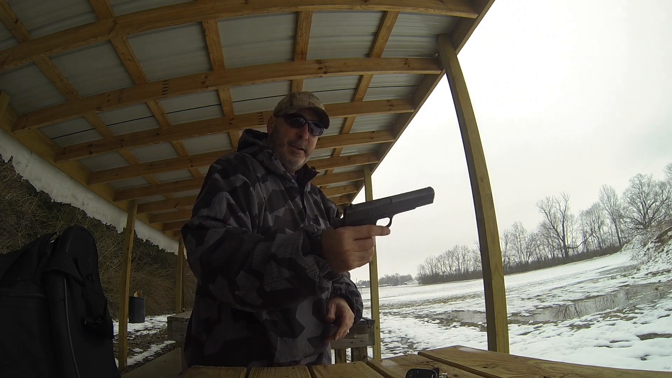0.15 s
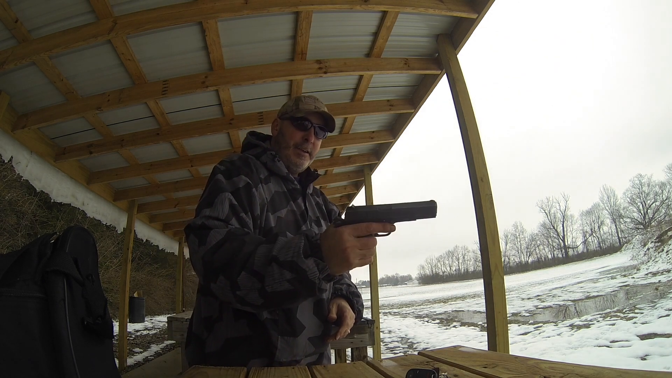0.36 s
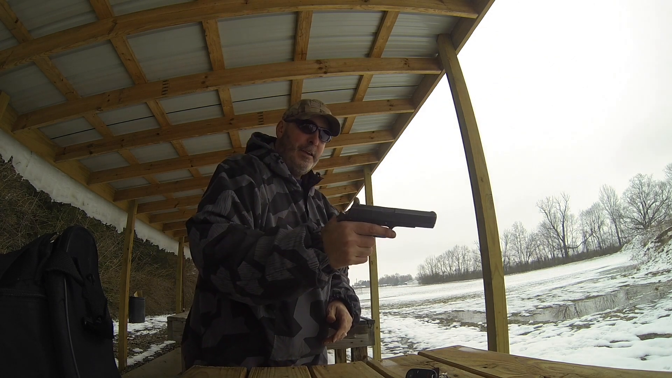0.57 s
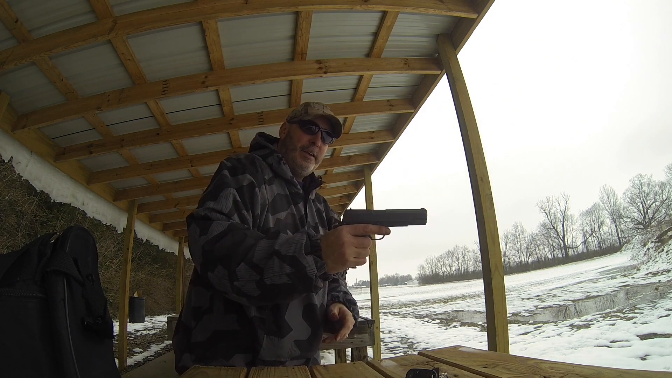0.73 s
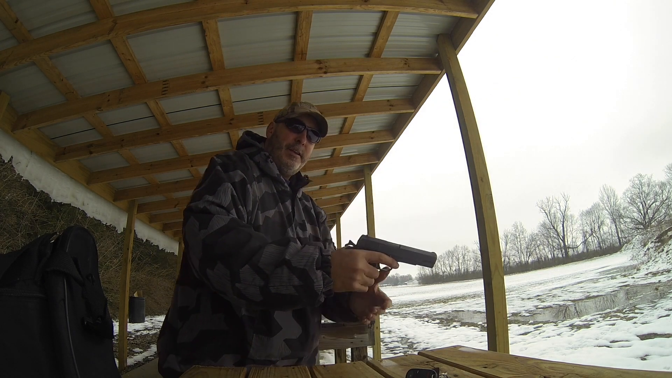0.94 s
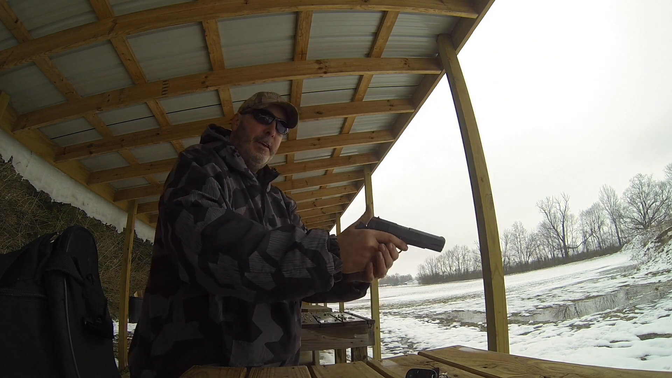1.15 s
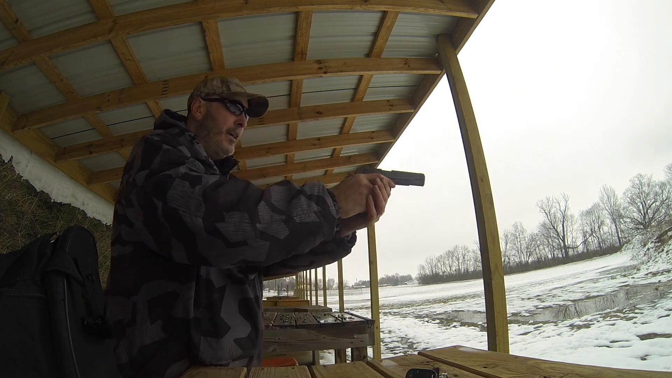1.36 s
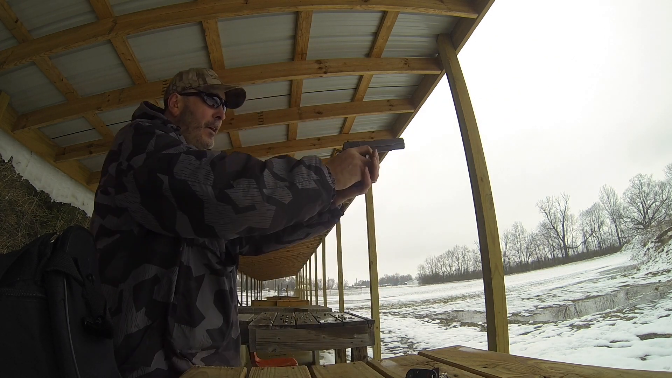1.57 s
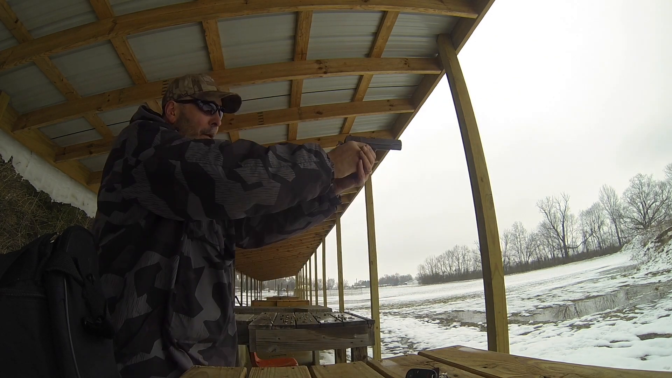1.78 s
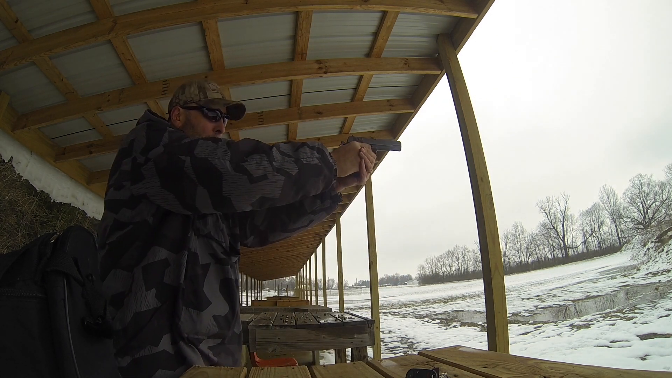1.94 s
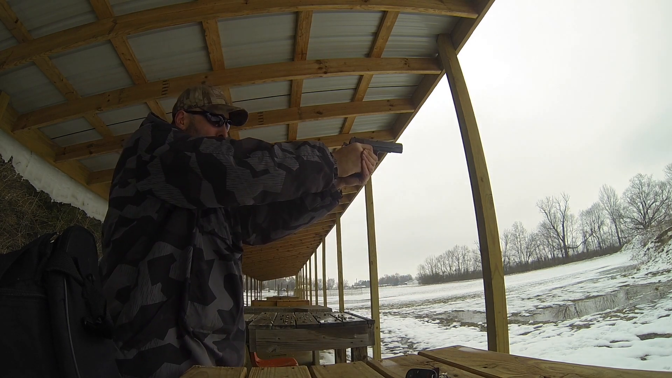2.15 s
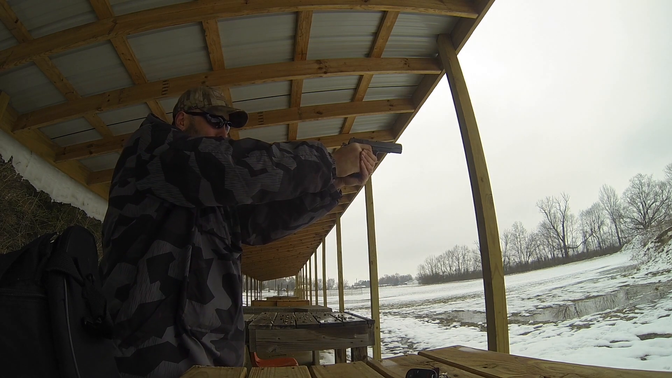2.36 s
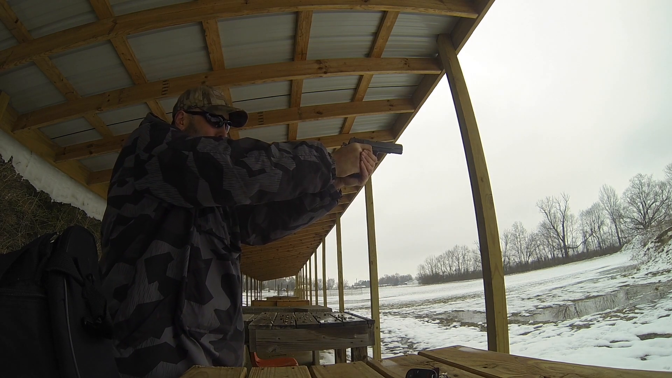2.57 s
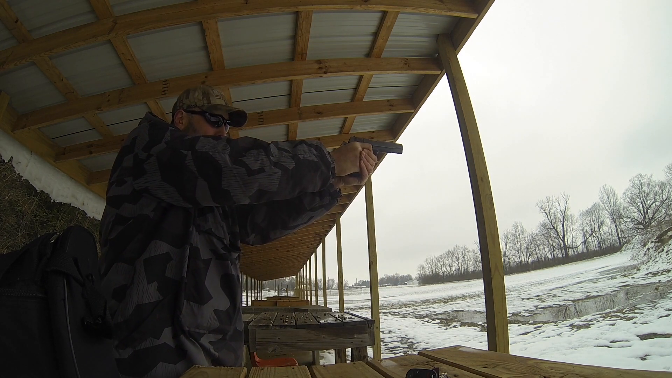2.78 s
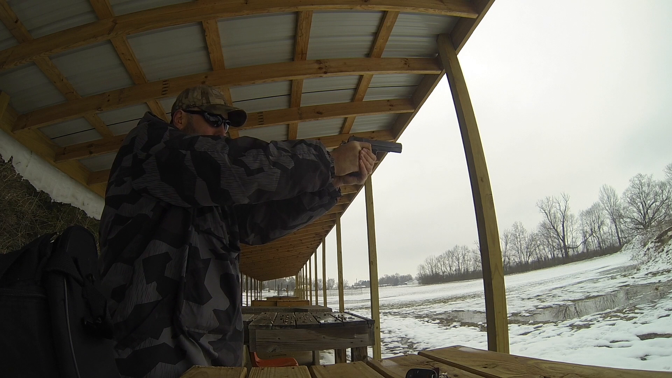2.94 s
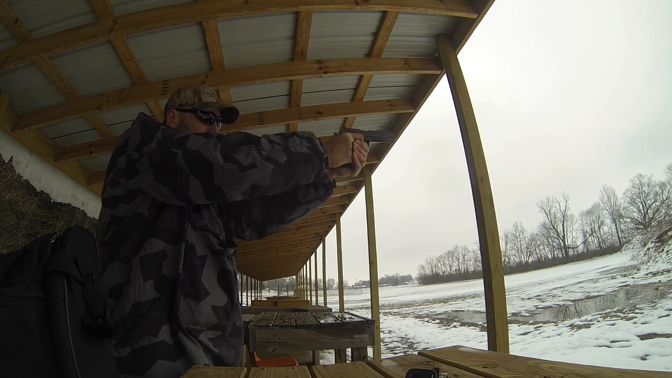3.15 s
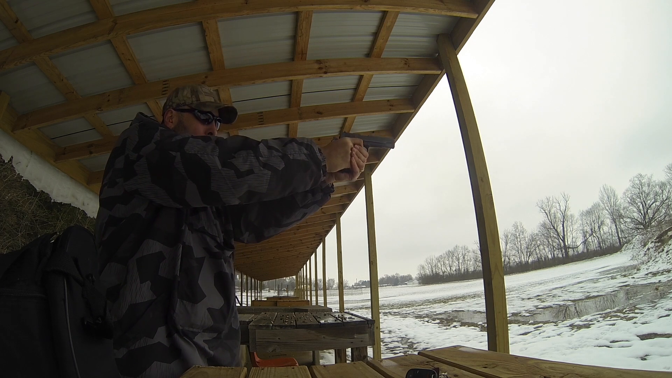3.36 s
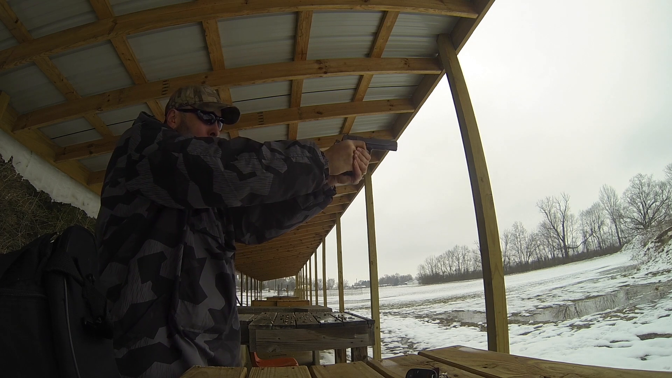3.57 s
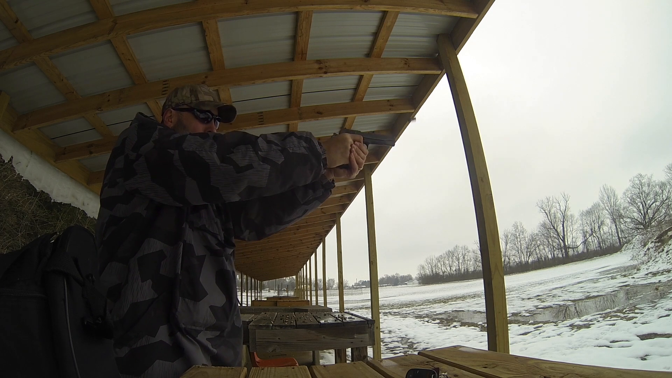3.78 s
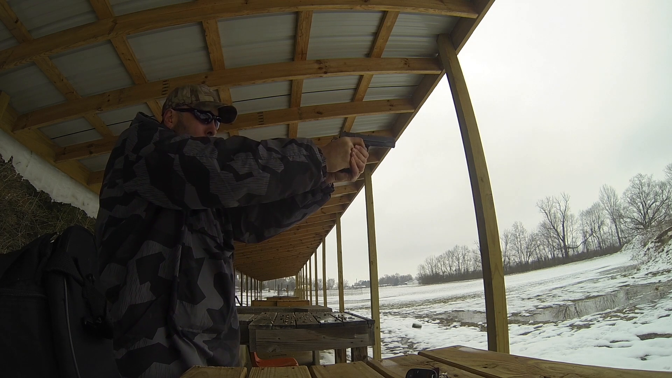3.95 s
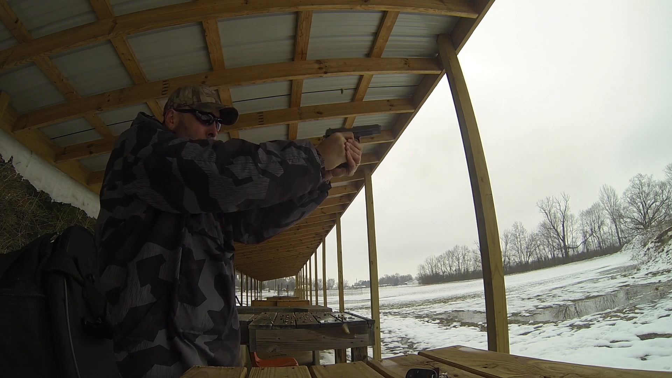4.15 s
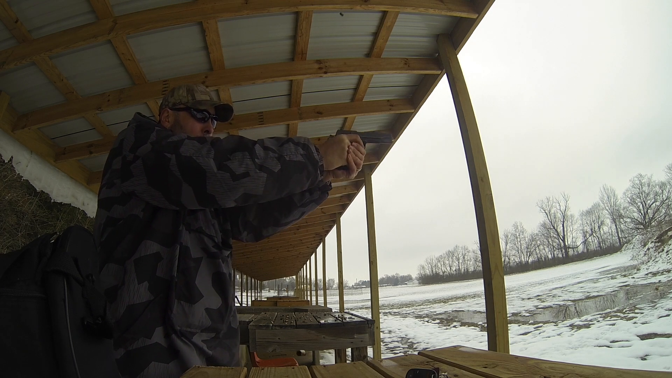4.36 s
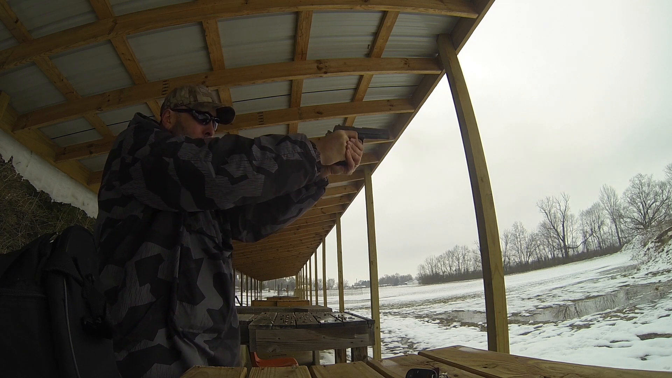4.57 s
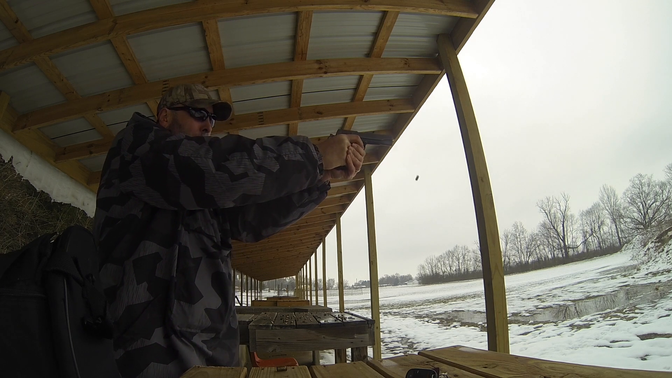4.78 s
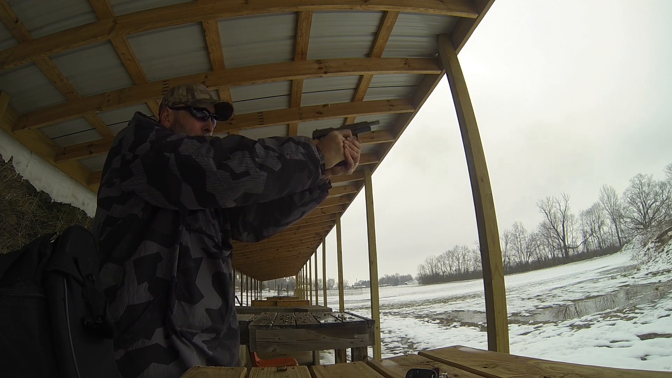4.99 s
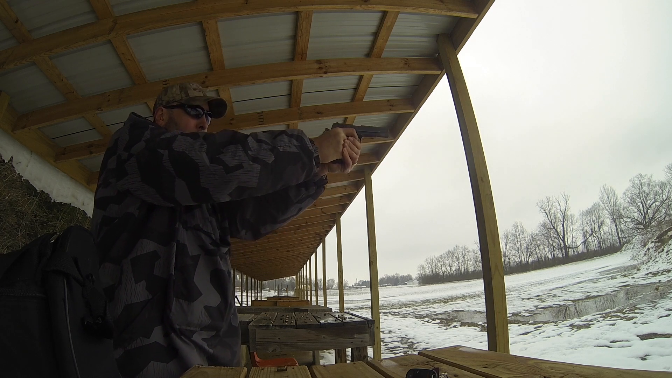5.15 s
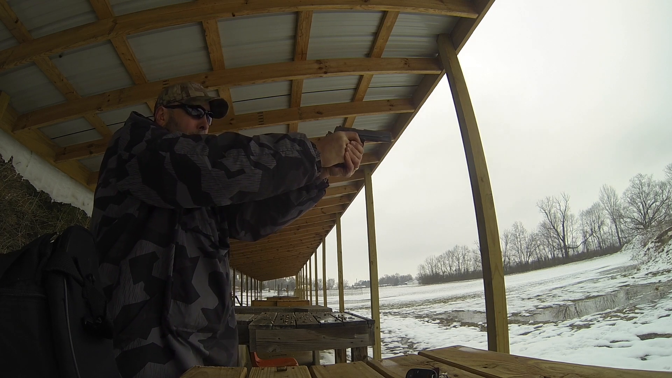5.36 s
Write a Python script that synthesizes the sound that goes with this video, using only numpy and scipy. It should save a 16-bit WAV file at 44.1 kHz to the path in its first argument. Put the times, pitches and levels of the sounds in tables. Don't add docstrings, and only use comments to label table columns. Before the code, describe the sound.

A pistol slide snaps shut, a catch clicks, the bench thuds, then five loud overloading shots crack and echo while spent cases knock nearby.

```python
import sys
import numpy as np
from scipy import signal
from scipy.fft import rfft, irfft, next_fast_len
from scipy.io import wavfile
from scipy.ndimage import uniform_filter1d

SR = 44100
rng = np.random.default_rng(int(sys.argv[2]) if len(sys.argv) > 2 else 0)


def bounce(signal):
    frames = np.transpose(np.atleast_2d(signal))
    limited = np.clip(frames, -1, 1)
    pcm = np.round(limited * 32767).astype(np.int16)
    wavfile.write(sys.argv[1], SR, pcm)


def voltage_ratio(decibels):
    exponent = np.asarray(decibels, float) / 20
    return 10 ** exponent


N = 239011


def unit(x):
    return x / np.sqrt(np.mean(x ** 2) + 1e-20)


def noise(size):
    return rng.standard_normal(size)


def along(points, hz):
    f, v = np.transpose(points)
    return np.interp(np.log(hz + 1), np.log(f + 1), v)


def resonances(modes, f):
    power = 0
    for centre, width, db in modes:
        power = power + voltage_ratio(2 * db) * (f * width) ** 2 / ((centre ** 2 - f ** 2) ** 2 + (f * width) ** 2)
    return np.sqrt(power)


def coloured(x, gain):
    m = 2 * next_fast_len(len(x) // 2 + 8192)
    cepstrum = irfft(np.log(gain(np.fft.rfftfreq(m, 1 / SR)) + 1e-6), m)
    cepstrum[1:m // 2] *= 2
    cepstrum[m // 2 + 1:] = 0
    return irfft(rfft(x, m) * np.exp(rfft(cepstrum)), m)[:len(x)]


def dying(t60s, size):
    hz, t, z = signal.stft(noise(size), SR, nperseg=128)
    fade = voltage_ratio(-60 * t / along(t60s, hz)[:, None])
    return signal.istft(z * fade, SR, nperseg=128)[1][:size]


def add(track, s, sound):
    part = track[round(s * SR):][:len(sound)]
    part += sound[:len(part)]


def hum(modes, t):
    total = 0
    for hz, db, t60 in modes:
        level = voltage_ratio(db + rng.normal(0, 1.93) - 60 * t / t60)
        total = total + level * np.sin(2 * np.pi * (hz * t + rng.random()))
    return total


# frequency in Hz, level in dB per Hz.
HISS = [(20, -1), (53, -1), (310, -15.5), (574, -19), (1200, -24.5), (1550, -21.5), (1900, -27.5),
        (3000, -24.5), (4300, -32.5), (5500, -34.5), (7500, -36), (10800, -39.5), (14700, -39.5),
        (16000, -52.5)]
# frequency in Hz,
# level in dB, switch-on time and length as shares of the read-out, line width in Hz.
WHINE = [(2589, -75, .25, .35, 10), (2998, -74, .6, .2, 10), (5060, -67, .72, .33, 90),
         (5523, -67.5, .11, .23, 90), (10643, -69, .72, .64, 2), (13187, -84, .11, .6, 2)]


def electronics():
    t = np.arange(N) / SR
    hiss = voltage_ratio(-49) * unit(coloured(noise(N), lambda f: voltage_ratio(along(HISS, f))))
    frame = 47.96 * (t - 1.7058)
    drift = np.cumsum(noise(N)) / np.sqrt(SR)
    tones = 0
    for hz, db, on, share, width in WHINE:
        switch = uniform_filter1d(0.28 + 0.82 * ((frame - on) % 1 < share), size=40)
        tone = np.sin(2 * np.pi * hz * t + np.sqrt(2 * np.pi * width) * drift)
        tones = tones + voltage_ratio(db + 4.5) * switch * tone
    beacon_s, beacon_period_s = .0762, .1024
    since = (t - beacon_s + .0098) % beacon_period_s - .01
    rebound = .25 * (since > .002) * np.exp(-np.abs(since) / .012)
    beacon = -np.exp(-(since / .0012) ** 2) + rebound
    return hiss + tones + voltage_ratio(-36.5) * beacon


# frequency in Hz, time to fall 60 dB in seconds.
SHELTER = [(100, 0.57), (500, 0.47), (1500, 0.62), (3000, 0.52), (6000, 0.37), (10000, 0.38), (15000, 0.17)]


def shelter(size):
    t = np.arange(size) / SR
    still_inside = 1 / (1 + np.exp(np.clip((t - .185) / .012, -50, 50)))
    return dying(SHELTER, size) * (.2 + .8 * still_inside)


# frequency in Hz, time to fall 60 dB in seconds.
NEARBY = [(200, 0.098), (1500, 0.19), (4000, 0.044), (12000, .02)]


def nearby(size):
    return dying(NEARBY, size)


# start in seconds, level in dB,
# time for the scrape to fall 60 dB in seconds, brightness in dB per octave.
STEEL_HITS = [(0, -26.5, 0.067, -4), (.0025, -25.5, 0.021, -14.5), (.0108, -14, 0.077, -6.5),
              (.018, -9.5, 0.094, -6), (.0300, -7, 0.044, -2), (.040, -19, 0.15, -7.5),
              (.865, -60, .031, 6), (1.424, -46, .11, -6), (1.549, -48, .036, -14), (1.92, -56, .03, 3)]
# frequency in Hz, width in Hz, level in dB.
STEEL = [(1640, 290, -7.5), (2490, 280, -2.5), (3220, 260, -1), (4457, 160, 0), (4870, 300, 1),
         (7160, 330, 3), (8370, 530, -6), (9530, 560, -4.5), (13200, 2000, -17)]
# start in seconds, level in dB,
# time for the scrape to fall 60 dB in seconds, brightness in dB per octave.
CATCH_HITS = [
    (.5595, -27.5, 0.016, -3),
    (.567, -39, 0.06, 3),
    (.582, -47, 0.064, -4),
    (.662, -47, 0.018, -6),
    (.688, -54, .04, -9),
]
# frequency in Hz, width in Hz, level in dB.
CATCH = [(2450, 500, 0.5), (3130, 260, 4), (3660, 260, -12), (6920, 290, 2.5), (8500, 700, -10),
         (11000, 1200, -16), (13500, 1400, -6.5)]


def pistol_parts():
    out, t = np.zeros(N), np.arange(SR // 5) / SR
    for hits, modes in [(STEEL_HITS, STEEL), (CATCH_HITS, CATCH)]:
        for s, db, t60, tilt_db in hits:
            def colour(f):
                tilt = voltage_ratio(tilt_db * np.log2((f + 100) / 4000))
                no_bass = f ** 2 / (f ** 2 + 1300 ** 2) * f ** 2 / (f ** 2 + 700 ** 2)
                return resonances(modes, f) * tilt * no_bass
            swell = voltage_ratio(-60 * t / t60) * (1 - np.exp(-t / (0.033 * t60)))
            grit = noise(len(t)) * voltage_ratio(5.6 * noise(len(t)))
            scrape = coloured(swell * grit, colour)
            add(out, s, voltage_ratio(db) * scrape / np.abs(scrape).max() * 2)
    tail = shelter(SR // 3) + voltage_ratio(22) * nearby(SR // 3)
    return out + voltage_ratio(-18.0) * signal.fftconvolve(out, tail / np.linalg.norm(tail))[:N]


# start in seconds, sway level in dB, rattle level in dB, time for the
# sway to fall 60 dB in seconds.
BOOMS = [
    (1.287, -21, -45.5, 0.28),
    (1.40, -36.5, -64, 0.36),
    (1.70, -49, -66, 0.35),
]
# frequency in Hz, width in Hz, level in dB.
RATTLE = [(1021, 48, 3.5), (1223, 18, 3), (1560, 49, -0.5), (1696, 58, -0.5), (2210, 68, -14)]


def booms():
    t, all_t = np.arange(SR) / SR, np.arange(N) / SR
    sway, shake = np.zeros(N), np.zeros(N)

    def swell(rise, t60):
        rising = np.sin(np.pi / 2 * np.clip(t / rise, 0, 1)) ** 2
        return rising * voltage_ratio(-60 * np.clip(t - rise, 0, None) / t60)

    for s, sway_db, rattle_db, t60 in BOOMS:
        add(sway, s, voltage_ratio(sway_db) * swell(0.055, t60))
        add(shake, s, voltage_ratio(rattle_db) * swell(0.011, 0.72))
    rattle = unit(coloured(noise(N), lambda f: resonances(list(RATTLE) + [(8330, 660, -27.5)], f)))
    rattle *= 1.75 + .5 * np.cos(2 * np.pi * 24 * all_t)
    bench_hz = 73
    return voltage_ratio(2.5) * sway * np.sin(2 * np.pi * bench_hz * all_t + 1.4) + shake * rattle


# frequency in Hz, level in dB.
TREES = [(100, 1.5), (300, 1.5), (500, 4.5), (1500, 6.5), (3000, -1.5), (4000, -7), (5500, -13),
         (8000, -13.5), (14000, -39.5)]


def far_answer(size):
    t = np.arange(size) / SR
    berm_s, rise_s, fall_s = .17, 0.075, 0.021
    berm = voltage_ratio(4.5) * np.exp(-np.abs(t - berm_s) / np.where(t < berm_s, rise_s, fall_s))
    trees = voltage_ratio(-4) * np.exp(-((t - 0.33) / 0.11) ** 2)
    valley = voltage_ratio(-14.5)
    return (berm + trees + valley) * unit(coloured(noise(size), lambda f: voltage_ratio(along(TREES, f))))


def surroundings(size):
    return voltage_ratio(-4.0) * nearby(size) + voltage_ratio(-19.5) * shelter(size) + voltage_ratio(-46) * far_answer(size)


def echo_rows(size):
    paths = np.zeros(size)
    bench_top, rafters = (0.001399, 0.002198, 12.8, 6.7, 2), (.0085, .0057, 3, 3.5, 8)
    posts, braces = (.0252, .0304, -3.5, 4.5, 6), (.070, .0315, -16, 1.5, 4)
    for s, step, db, loss_db, count in [bench_top, rafters, posts, braces]:
        k = np.arange(count)
        places = np.round((s + step * k) * SR).astype(int)
        paths[places] += rng.choice([-1, 1], count) * voltage_ratio(db - loss_db * k)
    slap = np.arange(110) / SR - .0012
    ripple = np.sin(2 * np.pi * 1600 * slap) * np.exp(-(slap / 0.00061) ** 2)
    return signal.fftconvolve(paths, ripple)[:size]


# start in seconds, blast level in dB, level of the low push in dB.
SHOTS = [
    (3.064, 1.5, 3.5),
    (3.7008, 0, -5),
    (4.1755, -1, -3.5),
    (4.5718, -1, -11.5),
    (5.0370, -1, -4),
]
# frequency in Hz, level in dB.
RUMBLE = [(20, -8), (40, 7.5), (90, 6.5), (160, -1), (300, -13), (600, -57)]
# frequency in Hz, level in dB, time to fall 60 dB in seconds.
SHEET = [(154, -4.5, 0.88), (249, -2.5, 0.48), (278, 3, 0.51), (344, -10.5, 0.5), (425, 5, 0.48),
         (496, 2, 0.38)]


def shots():
    size = round(1.2 * SR)
    t = np.arange(size) / SR
    u = t[:400] / 0.000099
    blast = -(1 - u) * np.exp(-u)
    same = voltage_ratio(-8.0) * echo_rows(size) + 1.054 * surroundings(size)
    same[:400] += voltage_ratio(13) * blast + voltage_ratio(20.0 - 60 * t[:400] / 0.0061) * noise(400)
    roof = voltage_ratio(-35.5) * (0.21 + np.cos(2 * np.pi * 27 * (t - .114))) * np.exp(-((t - .125) / 0.049) ** 4)
    dip = -1.5 * np.sin(np.pi * t / .0075) ** 2
    drift_back = np.tanh((t - .0075) / 0.001) * 0.69 * voltage_ratio(-60 * t / 0.084)
    overload = np.where(t < .0075, dip, drift_back)
    air, push = np.zeros(N), np.zeros(N)
    for s, db, push_db in SHOTS:
        add(air, s, voltage_ratio(db) * (same + 0.8 * surroundings(size)))
        add(push, s, voltage_ratio(push_db) * (overload + roof))
        rumble = unit(coloured(noise(size), lambda f: voltage_ratio(along(RUMBLE, f))))
        add(push, s, voltage_ratio(-41.0 - 60 * t / 1.2) * rumble)
        add(push, s, voltage_ratio(db - 36) * (1 - np.exp(-t / 0.014)) * hum(SHEET, t))
        burst = voltage_ratio(-60 * t[:900] / 0.0094) * noise(900)
        crack = coloured(burst, lambda f: resonances([(4170, 6000, 0.0045)], f) ** 2)
        add(push, s, voltage_ratio(db + 14.5) * crack)
    return air, push


# frequency in Hz, width in Hz, level in dB.
HOUSING = [(1555, 82, 20.5), (1400, 246, 13), (1100, 160, -1.5), (2663, 420, 12), (3430, 460, 4.5),
           (5220, 280, 5.5), (6950, 740, 5)]
# frequency in Hz, level in dB.
SEAL = [(30, -16.5), (100, -10.5), (300, 6), (800, -1), (2000, -3), (4000, 0), (8000, -9.5), (13000, -17),
        (15300, -25), (17000, -30)]


def through_housing(air):
    return coloured(air, lambda f: voltage_ratio(along(SEAL, f)) * np.hypot(1, resonances(HOUSING, f)))


def gain_control():
    duck_db, hold_s, recover_db_per_s, overload_db = -14, .25, 16, -2
    loud = [row[0] for row in SHOTS]
    for knocks in (HOUSING_KNOCKS, BOARD_KNOCKS):
        loud += [row[0] for row in knocks if row[1] > overload_db]
    loud = np.sort(loud)
    t = np.arange(N) / SR
    since = t - np.append(-np.inf, loud)[np.searchsorted(loud, t)]
    return voltage_ratio(np.clip(duck_db + recover_db_per_s * (since - hold_s), duck_db, 0))


# frequency in Hz, level in dB,
# time to fall 60 dB in seconds.
MOUTH = [(7530, -2, 0.28), (7780, -7, .2)]
SIDE = [(7280, 0, .2), (11700, -1.9, .13)]
BASE = [(6915, -5, .2), (7900, -9, .2), (10260, -2, .13)]
# start in seconds, level in dB.
MOUTH_RINGS = [(3.514, -56), (4.321, -44)]
SIDE_RINGS = [(5.249, -54), (5.324, -62)]
BASE_RINGS = [(4.461, -43), (4.961, -60)]


def brass():
    out, t = np.zeros(N), np.arange(SR // 2) / SR
    for rings, modes in [(MOUTH_RINGS, MOUTH), (SIDE_RINGS, SIDE), (BASE_RINGS, BASE)]:
        for s, db in rings:
            for hz, mode_db, t60 in modes:
                spin = 1 + .6 * np.cos(2 * np.pi * rng.uniform(33, 70) * t)
                tone = np.sin(2 * np.pi * hz * (1 + rng.normal(0, .003)) * t)
                tick = voltage_ratio(-60 * t / 0.0114) * noise(len(t))
                add(out, s, voltage_ratio(db + mode_db) * (voltage_ratio(-60 * t / t60) * spin * tone + tick))
    return out


# start in seconds, level in dB,
# main mode in Hz, length in seconds.
HOUSING_KNOCKS = [(3.517, -25, 1482, 0.016), (3.667, -29, 1580, .004), (3.9573, -12, 1610, 0.0043),
                  (3.9637, -20.5, 1690, 0.018), (3.978, -0.5, 1100, 0.0084), (3.9806, 4, 1576, .0079),
                  (3.9887, 5.5, 1577, 0.0056), (3.995, -7, 1390, 0.0051), (4.002, -14.5, 1153, 0.0099),
                  (4.3141, 6.5, 1620, 0.0046), (4.328, -15, 1200, 0.0044), (4.723, -13, 1640, 0.0065),
                  (4.724, -23, 1220, 0.012), (4.833, -8, 1668, 0.0069), (4.836, -19, 1230, 0.01),
                  (5.323, -20.5, 1560, .01)]
# start in seconds, level in dB, main mode in Hz, length in seconds.
BOARD_KNOCKS = [(4.313, -4, 1400, .0012), (4.3196, -8, 1161, 0.0056), (4.4631, -5.5, 1400, 0.0054),
                (4.469, -20.5, 1025, 0.02), (4.5303, -2, 1197, 0.0093), (4.922, -28, 994, 0.0092),
                (4.997, -30.5, 974, 0.0049), (5.251, -20, 1450, 0.002)]
# frequency in Hz, width in Hz, level in dB.
PLANK = [(303, 84, -14.5), (640, 170, -4), (1020, 98, -7), (1220, 170, 4.5), (1620, 99, 10),
         (2300, 120, -20), (2574, 120, -11), (2880, 240, -19.5), (4000, 370, -19.5), (6800, 2000, -38)]
# start in seconds, level in dB.
CRACKS = [
    (4.3125, -12.5),
    (4.4613, -18),
    (5.248, -33.5),
]


def knocks_and_cracks():
    out, t = np.zeros(N), np.arange(SR // 2) / SR
    for knocks, upper_db, rattle_db in [(HOUSING_KNOCKS, -30.5, -17.5), (BOARD_KNOCKS, -4.5, -9.5)]:
        for s, db, hz, length in knocks:
            a, b, c = noise(3)
            upper = np.sin(2 * np.pi * 2560 * (1 + 0.027 * a) * t)
            upper += voltage_ratio(-7.5 + 4.4 * b) * np.sin(2 * np.pi * 2270 * (1 + 0.01 * c) * t)
            main = np.sin(2 * np.pi * hz * (t + round(s * SR) / SR))
            ring = (main + voltage_ratio(upper_db) * upper) * np.exp(-(t / length) ** 1.55)
            ring *= np.tanh((t / (0.11 * length)) ** 2)
            rattle = unit(coloured(noise(len(t)), lambda f: resonances(PLANK, f) / (1 + (f / 5500) ** 4)))
            rattle *= voltage_ratio(rattle_db - 60 * t / 0.068) * (1 - np.exp(-t / 0.00052))
            add(out, s, voltage_ratio(db) * (ring + rattle))
    for s, db in CRACKS:
        burst = voltage_ratio(-60 * t / 0.029) * noise(len(t))
        crack = coloured(burst, lambda f: resonances([(3720, 4400, 2)], f) ** 2 / (1 + (f / 8000) ** 6))
        add(out, s, voltage_ratio(db) * crack)
    tail = shelter(SR // 3)
    bright = coloured(out, lambda f: f / (f + 3000))
    return out + voltage_ratio(-26) * signal.fftconvolve(bright, tail / np.linalg.norm(tail))[:N]


# start in seconds, level in dB.
THUMPS = [(3.977, -29), (4.314, -27.5), (4.4639, -29.5), (4.528, -33.5), (4.833, -32), (4.922, -34)]
# frequency in Hz, level in dB, time to fall 60 dB in seconds.
BENCH = [(73.8, -2, 0.37), (221, -13, 0.41), (301, -19.5, 0.51), (438, -17.5, 0.46)]


def bench_thumps():
    out, t = np.zeros(N), np.arange(SR // 2) / SR
    for s, db in THUMPS:
        add(out, s, voltage_ratio(db + 5) * hum(BENCH, t) * (1 - np.exp(-t / 0.0039)))
    return out


def scene():
    air, push = shots()
    cases = brass() + knocks_and_cracks() + bench_thumps()
    mix = through_housing(air) + push + cases + pistol_parts() + booms()
    mix = mix + gain_control() * electronics()
    top_hz = 15310
    return coloured(mix, lambda f: 1 / np.hypot(1, (f / top_hz) ** 300))[None]


def band_limit(x):
    return signal.sosfilt(signal.butter(12, 16960, fs=SR, output="sos"), x)


def record(dry):
    clipped = dry / (1 + np.abs(dry / 1.0) ** 14) ** (1 / 14)
    return band_limit(clipped)


dry = scene()
out = record(dry)
bounce(out)
```